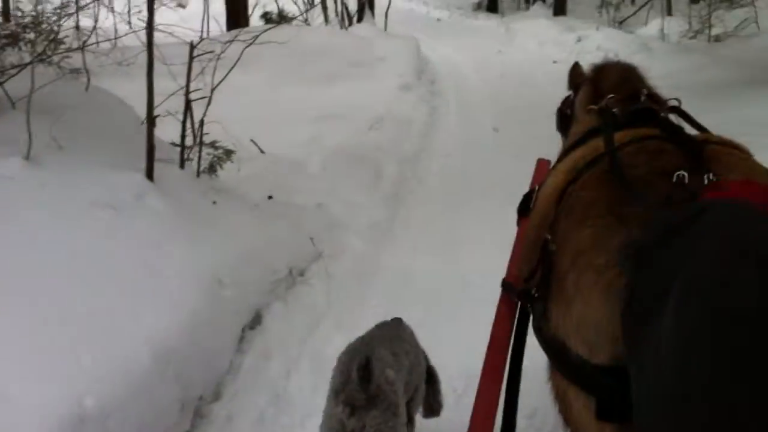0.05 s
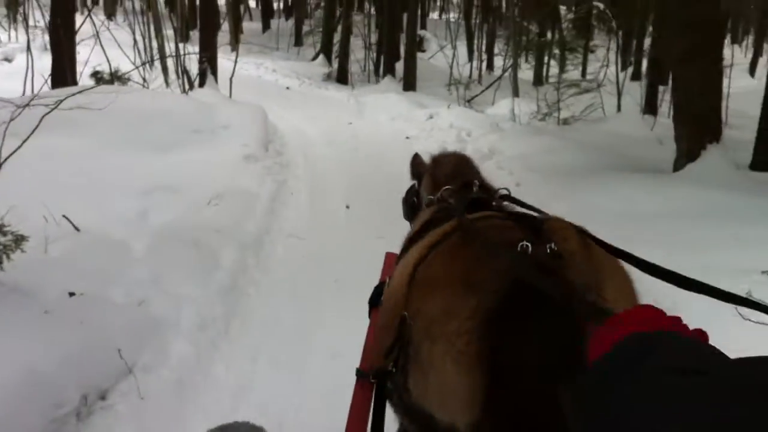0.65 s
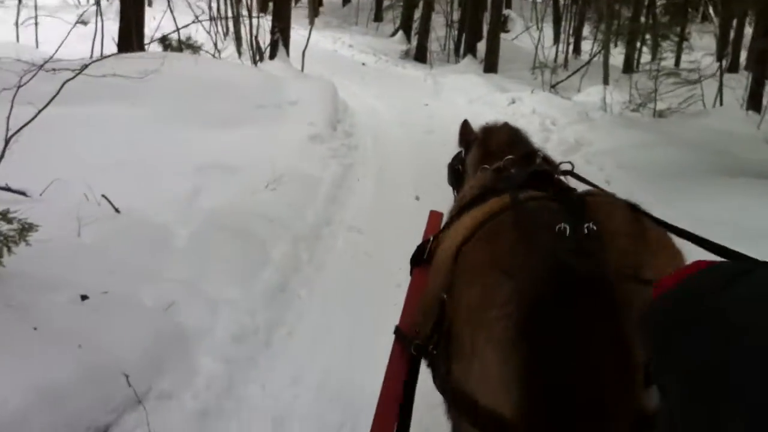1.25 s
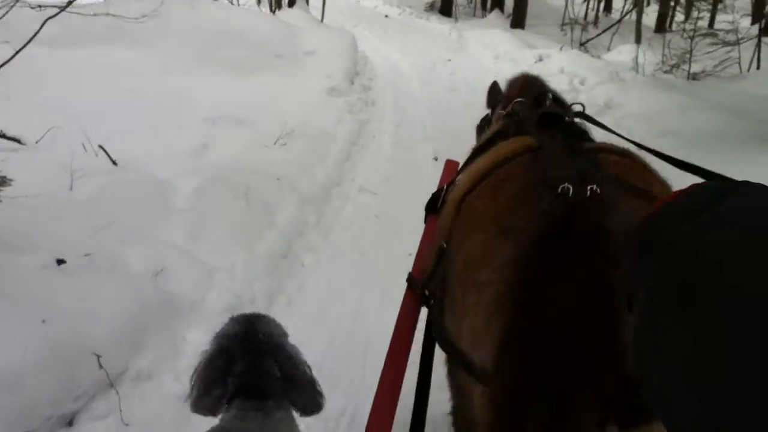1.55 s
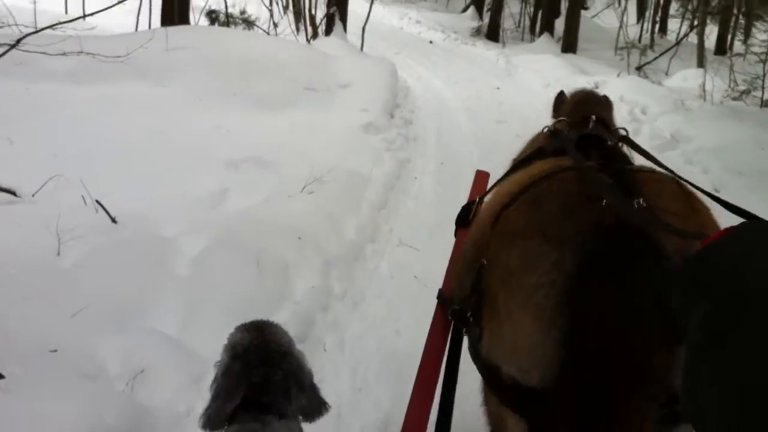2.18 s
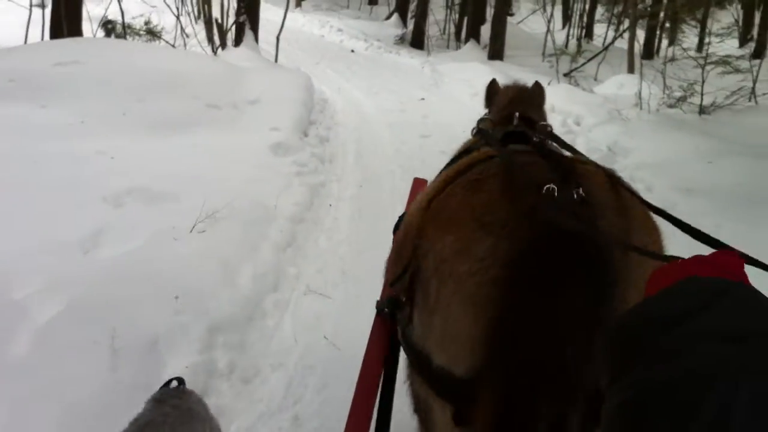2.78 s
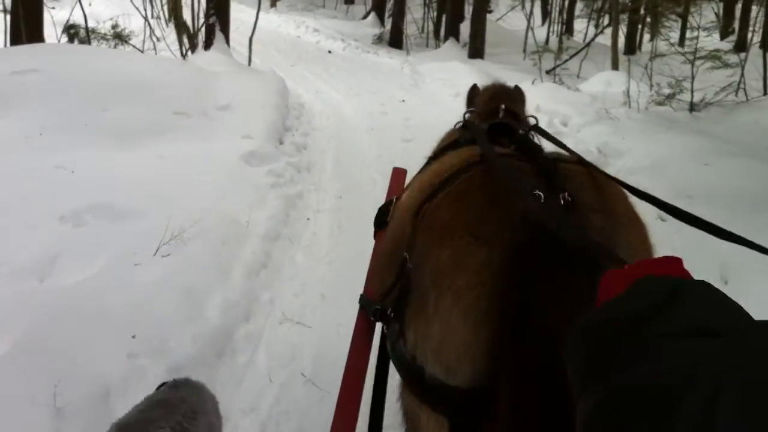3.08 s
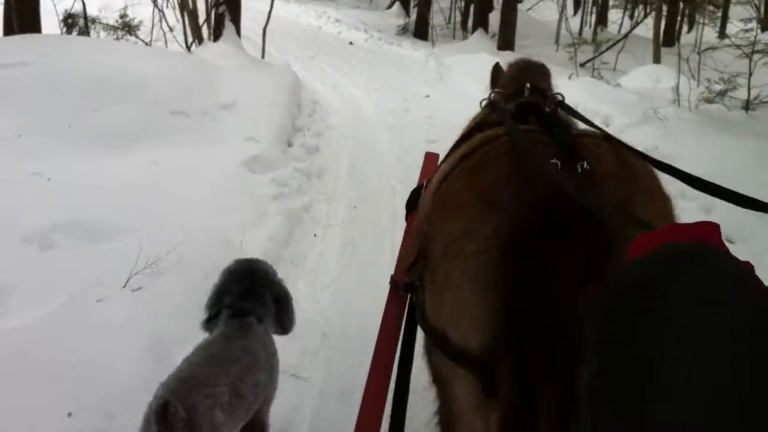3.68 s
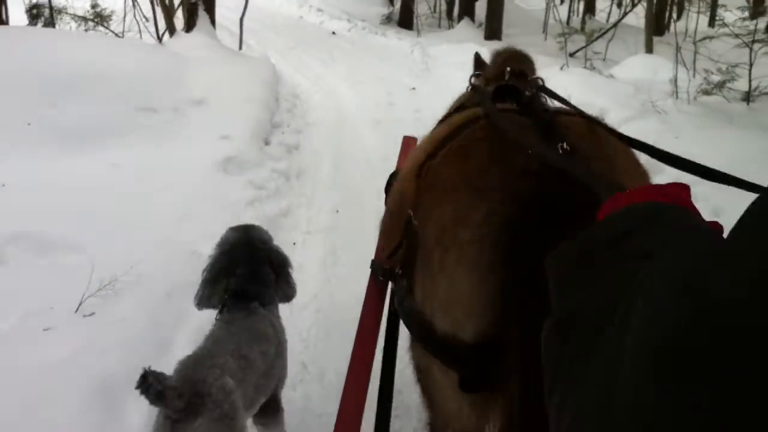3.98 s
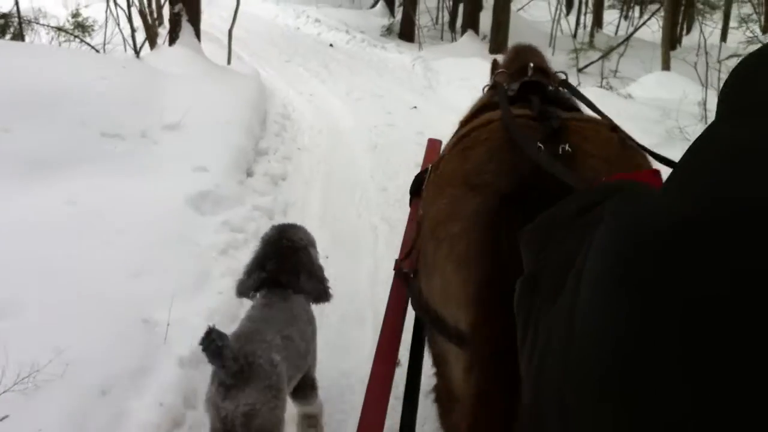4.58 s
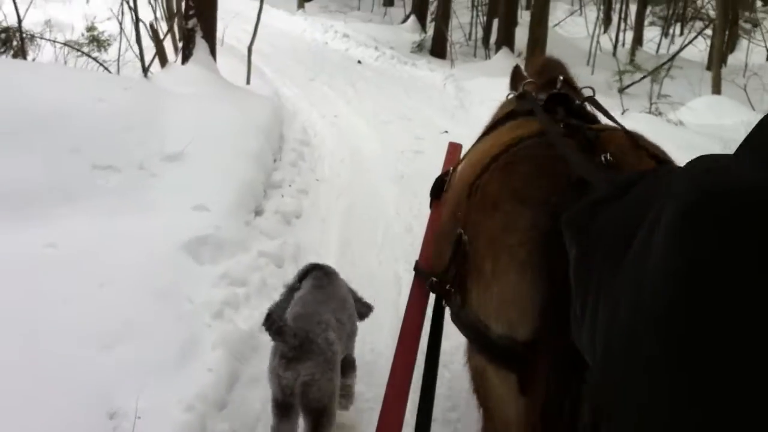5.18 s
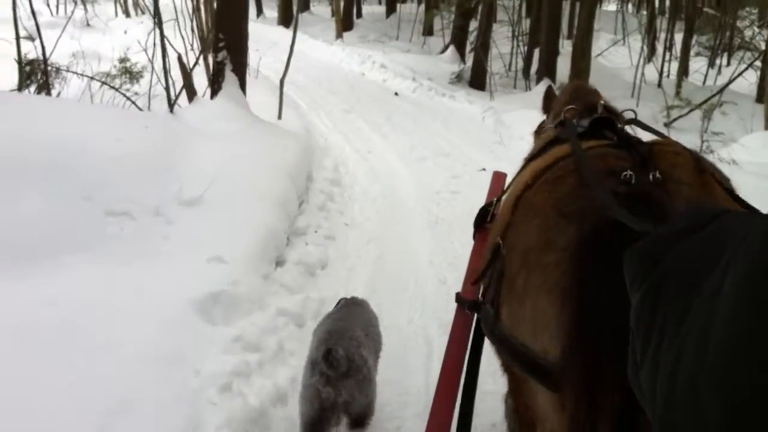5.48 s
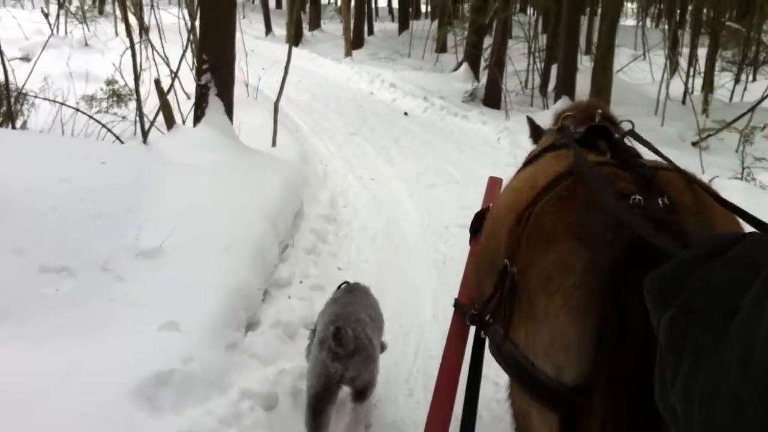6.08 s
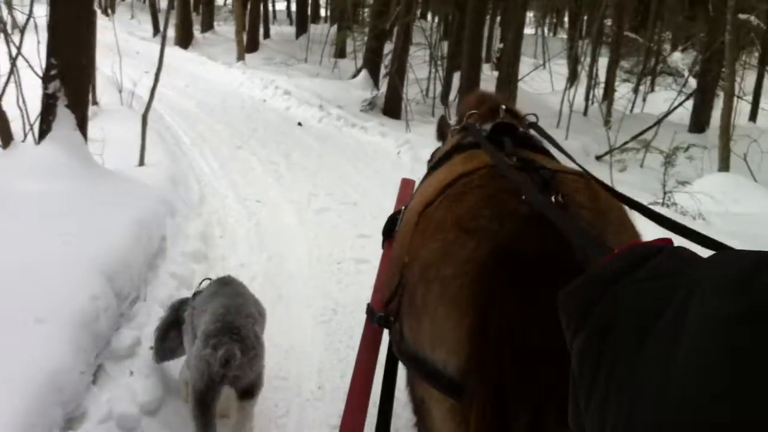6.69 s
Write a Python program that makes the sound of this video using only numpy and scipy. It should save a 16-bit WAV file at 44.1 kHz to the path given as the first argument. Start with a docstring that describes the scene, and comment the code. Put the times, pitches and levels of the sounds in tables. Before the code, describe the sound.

A horse-drawn sleigh slides over packed snow in open woods, heard from the seat with no echo. Gusts make a low, fluttering rumble on the microphone, above a softer scrape and hiss from the runners. At first, bumps thump the wooden box and the shafts and harness knock. The blows pause briefly, then hollow booms lead to a cluster of sharper knocks. The scraping eases, and a few last thumps follow.

```python
"""A horse-drawn sleigh on packed snow, heard from the seat. From the start, gusting air and the jolting
sleigh make a low rumble, while friction at the runners scrapes, grinds and hisses. In the first three
seconds bumps thump the box, shafts and harness knock in their fittings, and a juddering runner makes
the box boom. The blows pause until about 4 s; then more booms lead to a cluster of knocks after 5 s.
The grinding and hiss ease, and a few last knocks and thumps follow."""
import sys
import numpy as np
from scipy import signal
from scipy.fft import rfft, irfft, next_fast_len
from scipy.io import wavfile
from scipy.ndimage import map_coordinates

SR = 44100
rng = np.random.default_rng(int(sys.argv[2]) if len(sys.argv) > 2 else 0)


def wav_out(sig):
    """Save sig, one row per channel (or a flat mono array), as 16-bit PCM at SR to the path in sys.argv[1]."""
    wavfile.write(sys.argv[1], SR, np.round(np.clip(np.atleast_2d(sig).T, -1, 1) * 32767).astype(np.int16))


N = 302085

# steady airflow and sway: t/s, roar level/dB, shudder level/dB
AIRFLOW = [(0.02, -27.5, -35.5), (0.26, -39, -32.5), (0.59, -40, -38), (0.82, -38, -31), (1.2, -35, -38),
           (1.55, -36.5, -31), (1.72, -39, -43), (2.62, -37.5, -38), (2.92, -34.5, -34.5),
           (3.3, -36, -38.5), (3.93, -38, -44), (4.58, -28, -35.5), (5.1, -32, -34), (5.29, -36, -51),
           (5.72, -48, -40.5), (6.13, -33.5, -42), (6.34, -38, -42), (6.85, -40, -52)]
# gusts of air: t/s, duration/s, roar level/dB, shudder level/dB
GUSTS = [(0.317, 0.22, -27, -28), (0.661, 0.081, -32.5, -27.5), (0.825, 0.039, -29, -35),
         (0.915, 0.18, -26.5, -31.5), (1.367, 0.073, -31.5, -28.5), (1.585, 0.029, -21.5, -27.5),
         (1.74, 0.035, -30, -32), (1.829, 0.12, -31.5, -30.5), (2.018, 0.093, -30.5, -30),
         (2.121, 0.34, -25.5, -28.5), (2.505, 0.06, -46, -32.5), (2.679, 0.027, -29.5, -34),
         (2.957, 0.2, -34, -38), (3.282, 0.021, -32, -51), (3.393, 0.13, -28, -31),
         (3.756, 0.024, -35, -41), (4.03, 0.213, -30.5, -35.5), (4.294, 0.21, -30.5, -34),
         (5.32, 0.085, -55, -40.5), (5.439, 0.21, -24, -32), (5.77, 0.38, -38, -46),
         (5.906, 0.14, -26.5, -39), (6.42, 0.145, -32, -31.5), (6.629, 0.013, -40, -28),
         (6.729, 0.0089, -34.5, -31)]
# spectra of the deep roar and the hollow shudder: f/Hz, level/dB
ROAR_SPECTRUM = [(20, -61), (50, -62), (75, -34), (98, -28.5), (120, -13), (150, 0.5), (185, -2.5),
                 (230, -10.5), (280, -15), (420, -37), (900, -94)]
SHUDDER_SPECTRUM = [(100, -42), (190, -8), (245, 3.5), (315, -1), (375, -11.5), (470, -17.5), (580, -30),
                    (900, -48), (2000, -54.5)]
# booms of the box: t/s, duration/s, f/Hz, level/dB
BOOMS = [(0.70, 0.073, 190.3, -28), (0.91, 0.23, 120.3, -38.5), (2.42, 0.12, 188.3, -22.5),
         (4.10, 0.085, 142, -30), (4.21, 0.064, 140, -22.5), (4.42, 0.16, 179, -26.5),
         (4.8, 0.25, 150.2, -35), (5.11, 0.083, 217.6, -31.5), (5.59, 0.11, 180.3, -21)]
# bumps under the runners: t/s, peak level before the high-pass filter/dB, cutoff f/Hz
BUMPS = [(0.054, -20, 750), (0.362, -19, 400), (0.642, -22, 500), (0.83, -20.5, 230), (1.025, -20, 400),
         (1.264, -12, 600), (1.503, -21, 450), (1.661, -18.5, 270), (1.743, -14.5, 219), (1.812, -18, 350),
         (2.135, -19.5, 600), (2.183, -14, 300), (2.555, -21.5, 600), (2.907, -23, 250), (4.193, -21, 300),
         (5.436, -18, 400), (5.451, -16.5, 300), (5.78, -19, 450), (6.197, -22, 400), (6.237, -19.5, 355),
         (6.544, -22.5, 500), (6.628, -20, 350), (6.726, -15.5, 394)]
# modes of the sleigh's box: f/Hz, level/dB, T60/s
BOX_MODES = [(144.7, 0, 0.053), (175.4, -5, 0.12), (212, 2.5, 0.058), (283.4, -5, 0.059), (327, 2, 0.028),
             (460, -12, 0.021)]
# envelopes of the runners' low scrape, grinding and fine hiss: t/s, level/dB
SCRAPE_LEVELS = [(0, -42.5), (.24, -46.5), (.4, -42), (.53, -50), (.59, -56), (.66, -44), (1.05, -45),
                 (1.16, -50), (1.36, -46.5), (1.68, -47.5), (1.85, -46.5), (2.0, -47.5), (2.13, -43.5),
                 (2.45, -41.5), (2.52, -50.5), (2.66, -48), (2.85, -46.5), (3.48, -46.5), (3.63, -50),
                 (3.92, -51.5), (4.17, -42.5), (4.36, -47), (4.9, -47), (5.2, -47), (5.29, -55.5),
                 (5.38, -52.5), (5.6, -44), (5.7, -58), (5.8, -50.5), (6.0, -48.5), (6.33, -51),
                 (6.52, -45.5), (6.8, -54.5)]
GRIND_LEVELS = [(0, -52.5), (.6, -51.5), (1.1, -51.5), (1.6, -49.5), (1.93, -51.5), (2.33, -51),
                (2.52, -53), (2.9, -53), (3.3, -54), (3.8, -54), (4.1, -52.5), (4.45, -52.5), (4.95, -50),
                (5.3, -55), (5.85, -58), (6.2, -56), (6.6, -56.5), (6.85, -55)]
HISS_LEVELS = [(0.0, -54.5), (0.63, -52.5), (1.98, -53.5), (2.59, -52.5), (3.15, -53), (3.59, -52),
               (4.21, -53), (4.8, -52.5), (5.46, -59), (5.91, -58.5), (6.85, -54.5)]
# spectra of the same three friction noises: f/Hz, level/dB
SCRAPE_SPECTRUM = [(200, -13.5), (450, 8), (560, 2.5), (700, 2), (1020, -0.5), (1350, -11.5), (2000, -18.5),
                   (5000, -51)]
GRIND_SPECTRUM = [(500, -25), (1000, -3), (1400, 0), (1900, 0), (2450, 0), (3100, -7.5), (4300, -15),
                  (6500, -16.5), (15000, -24)]
HISS_SPECTRUM = [(1500, -3), (4000, 3.5), (7000, -1), (10000, 1), (13000, 0), (15800, -4.5)]
# shaft and harness knocks: t/s, body level/dB, body centre f/Hz, clack level/dB, clack centre f/Hz,
# snap level/dB, snap tilt/(dB per octave)
KNOCKS = [(0.641, -42, 850, -36, 2100, -44.5, -5), (1.1972, -47, 1000, -42.5, 2300, -40, -5.5),
          (1.264, -40.5, 700, -42, 1950, -44.5, 1), (1.428, -37, 700, -33, 1910, -43, -6),
          (2.1378, -49, 800, -39, 1760, -46, -6), (2.5521, -44.5, 900, -46, 3400, -50, -7),
          (2.632, -53, 900, -49, 2800, -51, -4), (2.7405, -44, 900, -44.5, 1700, -47.5, -7),
          (2.971, -40, 1100, -46.5, 1800, -42.5, -8), (4.2007, -51, 1000, -42.5, 2010, -44, -10),
          (5.073, -37, 900, -40, 4430, -38, -5), (5.082, -35, 720, -50, 1500, -54, -6),
          (5.1675, -33.5, 800, -31, 2020, -47, -7), (5.248, -50, 900, -42, 2250, -50, -2),
          (5.4422, -33, 690, -34.5, 2100, -36.5, -2), (5.679, -54, 900, -46.5, 2600, -60, 3),
          (5.7305, -41.5, 1120, -50, 2200, -58, 0), (5.7776, -43, 800, -55, 2000, -51, 3),
          (6.193, -47, 700, -57, 1700, -61, -2), (6.34, -57, 1000, -44.5, 1770, -46.5, -9),
          (6.545, -39, 1060, -44, 1910, -41.5, -4), (6.7247, -41.5, 910, -48, 2190, -50, -6)]
# lower and upper modes of the wooden shafts: f/Hz, level/dB, T60/s
SHAFT_BODY_MODES = [(546, 13, 0.057), (686, 5.5, 0.055), (797, 6.5, 0.06), (978, 10, 0.053),
                    (1167, 11, 0.041)]
SHAFT_CLACK_MODES = [(1290, 9, 0.031), (1578, 15.5, 0.021), (1920, 15.5, 0.019), (2274, 9, 0.032),
                     (2490, 7.5, 0.029), (2860, 11, 0.02), (3680, 8, 0.036), (4110, 2, 0.027),
                     (4590, 0, 0.022)]
# spectrum of the contact snap: f/Hz, level/dB
SNAP_SPECTRUM = [(2000, -14), (3900, 5), (6000, -1), (8200, 1.5), (11000, -0.5), (15800, 4)]
# snow crunching under hoof and runner, and a brief high jingle at 2.665 s: t/s, duration/s, centre f/Hz,
# level/dB
CRUNCHES = [(0.398, 0.042, 895, -45), (0.89, 0.028, 5000, -55), (0.894, 0.025, 620, -44),
            (1.02, .07, 1050, -52), (1.056, 0.029, 9000, -53), (1.178, .09, 11900, -52),
            (1.93, 0.045, 1840, -43), (2.254, 0.054, 1100, -42.5), (2.344, .03, 950, -44),
            (2.445, 0.031, 593, -51), (2.665, 0.017, 10900, -51), (3.593, 0.008, 4300, -50),
            (3.74, 0.03, 5000, -54), (3.758, 0.016, 1100, -44), (4.958, 0.018, 2120, -44),
            (4.964, 0.019, 8000, -48.5), (5.323, 0.019, 1050, -46.5), (5.39, 0.09, 486, -47),
            (5.637, 0.022, 2700, -50.5), (6.251, 0.025, 4300, -48.5)]
# thin squeaks and a low creak of the fittings: t/s, duration/s, f/Hz, level/dB
SQUEAKS = [(1.92, 0.013, 1970, -45), (3.985, 0.032, 7800, -56.5), (5.4, 0.028, 462, -41.5)]

GUST_ATTACK_S, GUST_RELEASE_S = 0.019, 0.038
FLUTTER_DB, FLUTTER_PER_S, LOAD_DB = 2, 36, .7
SCRAPE_FLUTTER = 0.75  # share of the rumble's flutter that the scrape follows
REBOUND_S, REBOUND_DB, SNAP_T60_S = 0.001785, -1, 0.023
FOCUS_DB = 15  # loss of a mode one octave from the centre of a blow
DETUNE = .011  # relative scatter of the mode frequencies
TOP_HZ = 15830


def rumble(flutter_db):
    """Incoherent addition: gusts add in power to the steady airflow and sway, in two bands of noise."""
    s, deep_db, hollow_db = np.transpose(AIRFLOW)
    deep, hollow = amp(curve(np.c_[s, deep_db])), amp(curve(np.c_[s, hollow_db]))
    for start, length, roar_db, shudder_db in GUSTS:
        shape = gust(start, length)
        deep = np.hypot(deep, amp(roar_db) * shape)
        hollow = np.hypot(hollow, amp(shudder_db) * shape)
    flutter = amp(flutter_db - 2.26)
    return flutter * (deep * even_noise(ROAR_SPECTRUM) + hollow * even_noise(SHUDDER_SPECTRUM))


def box_booms():
    """Forced vibration: a juddering runner drives the box on one wavering note."""
    return tones(BOOMS, waver=0.0591, rate=57, judder_db=1)


def box_thumps():
    """Impulse response: each bump rings the box's modes, and a softer blow favours the lower ones."""
    track, t = np.zeros(N), np.arange(SR // 4) / SR
    hz, mode_db, t60 = np.transpose(BOX_MODES)
    onset = 1 - np.exp(-t / 0.0036)
    for s, db, cutoff_hz in BUMPS:
        excited = np.c_[hz, mode_db - 20 * np.log10(1 + (hz / cutoff_hz) ** 4), t60]
        thump = onset * ring(excited, t, scatter_db=-1.0)
        add(track, s - .003, amp(db) * unit_peak(thump))
    # high-pass filter: the thumps have little deep bass
    return signal.sosfilt(signal.butter(6, 122, "highpass", fs=SR, output="sos"), track)


def runners(flutter_db):
    """Sliding friction: snow grains scrape, grind and hiss, modulated in level as the load shifts."""
    load_db = LOAD_DB * wobble(30)
    lumps = grains(N, rate=500, spread_db=2.0) + 0.78 * rng.standard_normal(N)
    scrape = amp(curve(SCRAPE_LEVELS) + SCRAPE_FLUTTER * flutter_db)
    scrape *= unit_rms(coloured(lumps, SCRAPE_SPECTRUM))
    snow = grains(N, rate=700, spread_db=5) + .8 * rng.standard_normal(N)
    grind = amp(curve(GRIND_LEVELS) + load_db + 0.9 * wobble(55))
    grind *= unit_rms(coloured(snow, GRIND_SPECTRUM))
    crystals = 0.41 * grains(N, rate=680, spread_db=6.5) + rng.standard_normal(N)
    hiss = amp(curve(HISS_LEVELS) + load_db + 1.53 * wobble(17))
    hiss *= unit_rms(coloured(crystals, HISS_SPECTRUM))
    return scrape + grind + hiss


def shaft_knocks():
    """Impact excitation: a fitting rings a shaft's hollow and clacking modes, with a snap of contact."""
    track, t = np.zeros(N), np.arange(SR // 8) / SR
    hz, spectrum_db = np.transpose(SNAP_SPECTRUM)
    onset = 1 - np.exp(-t / 0.00055)
    decay = amp(-60 * t / SNAP_T60_S) + .03 * amp(-60 * t / 0.097)
    for s, body_db, body_hz, clack_db, clack_hz, snap_db, tilt_db in KNOCKS:
        body = amp(body_db) * strike(SHAFT_BODY_MODES, body_hz, t)
        clack = amp(clack_db) * strike(SHAFT_CLACK_MODES, clack_hz, t)
        noise = coloured(rng.standard_normal(len(t)), np.c_[hz, spectrum_db + tilt_db * np.log2(hz)])
        snap = amp(snap_db) * unit_burst(noise * onset * decay)
        add(track, s, body + clack + snap)
    return signal.sosfilt(signal.butter(4, 380, "highpass", fs=SR, output="sos"), track)


def snow_crunches():
    """Brittle fracture: snow gives way in short swells of band-filtered clicks; one high swell is a faint
    jingle."""
    track = np.zeros(N)
    for s, length, hz, db in CRUNCHES:
        band = [(hz / 6, -28), (hz / 2, -10), (hz, 0), (hz * 2, -14), (hz * 6, -40)]
        crush = unit_rms(coloured(grains(SR, rate=700, spread_db=0.0), band))
        add(track, s - .5, amp(db) * swell(length) * crush)
    return track


def fitting_squeaks():
    """Friction-induced vibration: rubbing makes a fitting sing briefly."""
    return tones(SQUEAKS, waver=0.0046, rate=790, judder_db=-2)


def gust(start, length):
    """Trapezoidal envelope: a gust rises quickly, holds and dies away."""
    t = np.arange(N) / SR - start
    rise = np.clip(.5 + t / GUST_ATTACK_S, 0, 1)
    return rise * np.clip(1 - (t - length) / GUST_RELEASE_S, 0, 1)


def even_noise(spectrum):
    """Envelope normalisation: noise divided by its running rms keeps only its fast fluctuations."""
    noise = unit_rms(coloured(rng.standard_normal(N), spectrum))
    window = signal.windows.hann(SR // 12)
    power = np.abs(signal.fftconvolve(noise ** 2, window / window.sum(), "same"))
    return unit_rms(noise / np.sqrt(power + 1e-4))


def tones(rows, waver, rate, judder_db):
    """Random modulation: brief sinusoids waver in frequency and amplitude."""
    track = np.zeros(N)
    for s, length, hz, db in rows:
        phase = 2 * np.pi * np.cumsum(hz * (1 + waver * wobble(rate, size=SR))) / SR
        envelope = amp(db + judder_db * wobble(rate, size=SR)) * swell(length)
        add(track, s - .5, envelope * np.sqrt(2) * np.sin(phase))
    return track


def strike(modes, centre_hz, t):
    """Selective excitation: a blow drives mostly the modes near its centre, then rebounds once."""
    hz, db, t60 = np.transpose(modes)
    excited = np.c_[hz, db - FOCUS_DB * np.log2(hz / centre_hz) ** 2, t60]
    contact = 1 - np.exp(-t / .00025)
    sound = contact * ring(excited, t, scatter_db=2.0)
    add(sound, REBOUND_S, amp(REBOUND_DB) * contact * ring(excited, t, scatter_db=3.0))
    return unit_burst(sound)


def ring(modes, t, scatter_db):
    """Modal superposition: damped sinusoids, scattered in strength, tuning and sign at every blow."""
    hz, db, t60 = np.transpose(modes)[:, :, None]
    strength, detune, sign = rng.standard_normal((3, len(modes), 1))
    waves = np.sign(sign) * np.sin(2 * np.pi * hz * (1 + DETUNE * detune) * t)
    return np.sum(amp(db + scatter_db * strength - 60 * t / t60) * waves, axis=0)


def grains(size, rate, spread_db):
    """Shot noise: snow crystals break at random moments, on average rate times a second."""
    breaks = rng.random(size) < rate / SR
    strength, push = rng.standard_normal((2, size))
    return unit_rms(breaks * amp(spread_db * np.minimum(strength, 2)) * np.sign(push))


def swell(length):
    """Gaussian envelope, centred in one second."""
    return np.exp(-2 * ((np.arange(SR) / SR - .5) / length) ** 2)


def wobble(rate, size=N):
    """Spline interpolation of random knots, rate of them a second."""
    return map_coordinates(rng.standard_normal(SR // 10), [np.arange(size) * rate / SR], mode="wrap")


def curve(rows):
    """Linear interpolation of (t/s, value) rows at every sample."""
    return np.interp(np.arange(N) / SR, *np.transpose(rows))


def coloured(x, points):
    """Spectral shaping by (f/Hz, level/dB) points on a logarithmic frequency axis."""
    m = next_fast_len(len(x) + 8192)
    hz, db = np.transpose(points)
    gain = amp(np.interp(np.log(np.fft.rfftfreq(m, 1 / SR) + 1), np.log(hz), db))
    return irfft(rfft(x, m) * gain, m)[:len(x)]


def add(track, s, sound):
    """Superposition of a sound on the track at time s."""
    start = max(round(s * SR), 0)
    part = track[start:start + len(sound)]
    part += sound[:len(part)]


def amp(db):
    """Amplitude ratio of a level in decibels."""
    return 10 ** (np.asarray(db) / 20)


def unit_rms(x):
    """Normalisation to rms 1."""
    return x / np.sqrt(np.mean(x ** 2) + 1e-20)


def unit_peak(x):
    """Normalisation to peak 1."""
    return x / (np.abs(x).max() + 1e-20)


def unit_burst(x):
    """Normalisation to the energy of 10 ms at rms 1."""
    return x / np.sqrt(np.sum(x ** 2) / (SR // 100) + 1e-20)


def scene():
    """Free-field superposition: open, snowy woods add no echo to the sources."""
    flutter_db = FLUTTER_DB * wobble(FLUTTER_PER_S)
    booms, squeaks = box_booms(), fitting_squeaks()
    low_sounds = rumble(flutter_db) + booms + box_thumps()
    snow = runners(flutter_db) + snow_crunches()
    return (low_sounds + snow + shaft_knocks() + squeaks)[None]


def record(dry):
    """Band limiting: an ideal low-pass filter removes everything above TOP_HZ."""
    m = next_fast_len(N + 8192)
    passband = np.fft.rfftfreq(m, 1 / SR) < TOP_HZ
    return irfft(rfft(dry, m) * passband, m)[:, :N]


dry = scene()
out = record(dry)
wav_out(out)
```